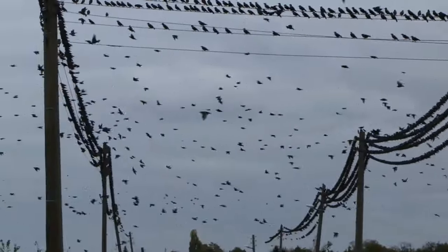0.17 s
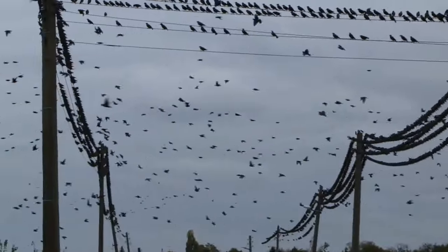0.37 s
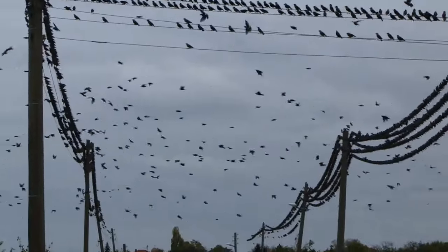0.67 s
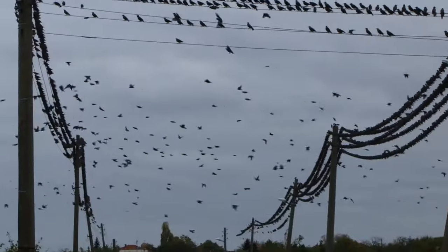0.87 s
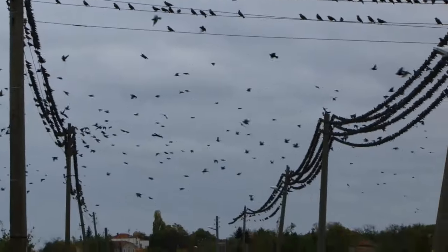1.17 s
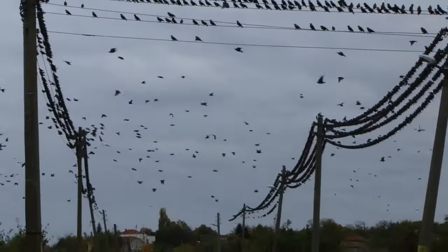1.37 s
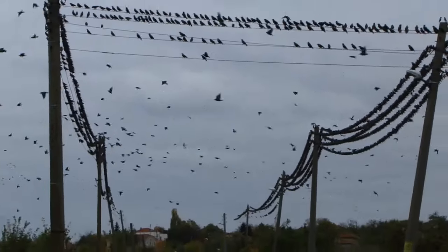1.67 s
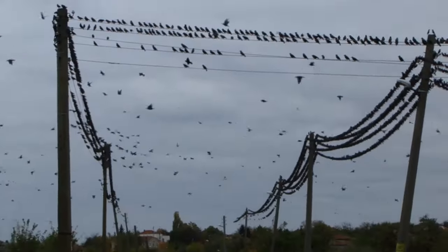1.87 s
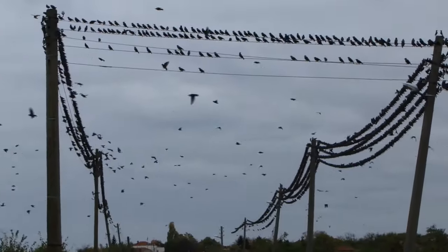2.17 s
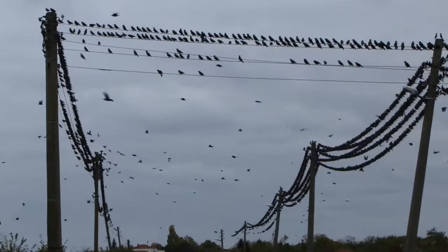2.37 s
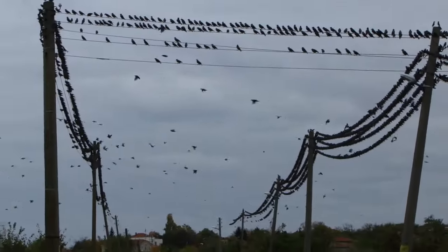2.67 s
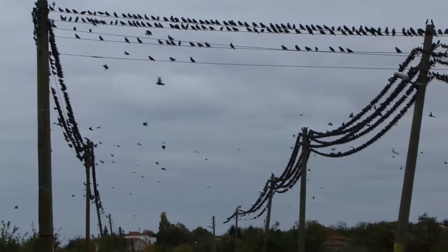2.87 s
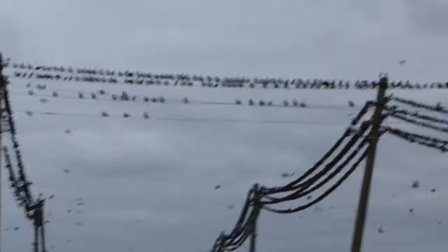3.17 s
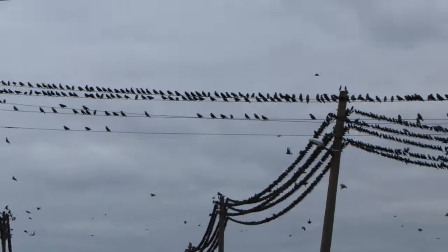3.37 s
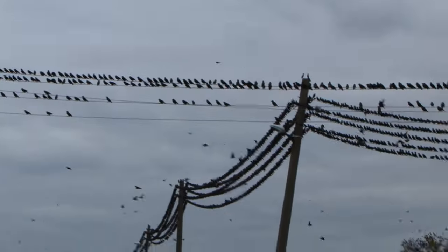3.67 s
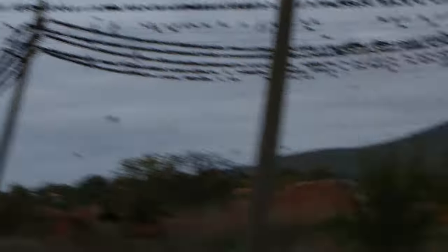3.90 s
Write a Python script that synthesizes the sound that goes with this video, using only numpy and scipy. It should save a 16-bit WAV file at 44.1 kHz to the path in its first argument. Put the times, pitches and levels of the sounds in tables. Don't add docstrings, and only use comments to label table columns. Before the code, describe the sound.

A large flock of small birds on wires and in flight makes a dense, continuous chatter for about four seconds, far voices fusing into a broad hiss. Tiny high whistles stand out nearby: a lower one at 1.3 s on the right, a brighter cluster around 1.95-2.25 s, and more near 2.6 and 3.0-3.1 s. Wind strikes the hand-held camera's two microphones as low, irregular, fluttering thumps, wide in stereo: heavy from the start to 0.6 s, strong again around 1.1-1.35 and 1.7-1.9 s, then thinning. Light plastic taps come at about 0.8-0.9 s and a soft one left at 1.5 s. Brief scratchy finger rubs at 3.15 and 3.3 s accompany the camera's turning, and the flock's colour loses some of its top. After a near calm around 3.45 s, a hard knock at 3.57 s, gusts returning, and the hardest clacking knocks at 3.8 s close the scene.

```python
import sys
import numpy as np
from scipy import signal
from scipy.fft import rfft, irfft
from scipy.io import wavfile
from scipy.ndimage import uniform_filter1d

SR = 44100
rng = np.random.default_rng(int(sys.argv[2]) if len(sys.argv) > 2 else 0)


def put_to_file(sound):
    columns = np.atleast_2d(sound).T
    safe = np.clip(columns, -1, 1)
    whole_steps = np.round(safe * 32767)
    wavfile.write(sys.argv[1], SR, whole_steps.astype(np.int16))


def boost(x):
    u = np.asarray(x, float) / 20
    return 10 ** u


N = 177987


def evened(x):
    return x / np.sqrt(np.mean(x ** 2) + 1e-20)


def read(points, hz, column=1):
    table = np.transpose(points)
    return np.interp(np.log(hz + 1), np.log(table[0] + 1), table[column])


def add(mix, s, sound):
    at = max(round(s * SR), 0)
    part = mix[:, at:at + sound.shape[1]]
    part += sound[:, :part.shape[1]]


def panned(x, pan_db):
    return x * boost(np.array([[pan_db / 2], [-pan_db / 2]]))


def slow(rate_hz, count):
    width = max(int(SR / rate_hz / 2), 1)
    noise = rng.standard_normal((count, N))
    return evened(uniform_filter1d(uniform_filter1d(noise, width), width))


# start in seconds, length in seconds, strength in dB.
GUSTS = [(0, 0.22, -29.5), (0.249, 0.028, -30.5), (0.336, 0.13, -34.5), (0.424, 0.056, -30.5),
         (0.653, .13, -39), (0.916, 0.065, -33), (1.034, 0.08, -41), (1.095, .14, -31), (1.282, .16, -34),
         (1.598, 0.11, -33.5), (1.692, 0.091, -31.5), (1.801, 0.11, -32.5), (1.945, 0.035, -35.5),
         (2.051, 0.11, -35), (2.222, 0.034, -35.5), (2.308, 0.077, -35.5), (2.504, 0.031, -39.5),
         (2.612, 0.024, -37), (2.703, 0.036, -45), (2.904, 0.038, -43), (3.158, 0.054, -41.5),
         (3.55, 0.065, -33.5), (3.635, 0.033, -36), (3.69, 0.13, -30.5), (3.828, 0.062, -34.5),
         (3.933, .03, -47.5), (3.982, 0.055, -35)]
# time in seconds, strength in dB.
BREEZE = [
    (0, -43),
    (1.5, -46.5),
    (2.4, -48),
    (3.1, -53),
    (3.45, -66),
    (3.6, -41),
    (4.04, -44),
]
GUST_EDGE_S, LEE_DB = 0.015, -4


def wind_strength():
    t = np.arange(N) / SR
    level_db = np.interp(t, *np.transpose(BREEZE))
    for s, length, db in GUSTS:
        inside = np.clip(np.minimum(t - s, s + length - t) / GUST_EDGE_S + 1, 0, 1)
        level_db = np.maximum(level_db, -60 + (db + 60) * inside)
    return level_db + np.array([[0], [LEE_DB]])


def thump(db, hz, coin, before=0.44, after=0.89, sag=0.063, kink=1.0):
    cycle = np.arange(-300, 500) / SR * hz
    shape = np.exp(-(cycle / np.where(cycle < 0, before, after)) ** 2)
    swing = np.cos(2 * np.pi * (cycle - sag * cycle ** 2)) * shape
    steepening = np.sin(2 * np.pi * 1.9 * cycle) * np.exp(-((cycle + 0.2) / 0.29) ** 2)
    swing += kink * boost(db) * steepening
    swing -= shape * swing.sum() / shape.sum()
    return boost(db) * (swing * np.sign(coin - .3))[None]


# time in seconds, peak in dB, frequency in Hz.
LEFT_THUMPS = [(.003, -9, 268), (.014, -9.5, 477), (.058, -15, 290), (.066, -8, 234), (.2, -19.5, 245),
               (.217, -23, 237), (.435, -7.5, 293), (.59, -10, 228), (.771, -15.5, 270), (.837, -14, 203),
               (1.112, -17, 268), (1.154, -16.5, 188), (1.165, -12.5, 335), (1.176, -16, 198),
               (1.321, -15, 312), (1.329, -5, 350), (1.694, -21, 296), (1.722, -10, 350), (1.82, -11, 228),
               (1.845, -16, 247), (1.886, -10, 287), (1.974, -18, 209), (2.116, -15.5, 219),
               (2.229, -15, 210), (3.585, -19, 182), (3.645, -11.5, 336), (3.735, -21, 300),
               (3.745, -21, 204), (3.779, -14, 250), (3.989, -17.5, 166)]
# time in seconds, peak in dB, frequency in Hz.
RIGHT_THUMPS = [(.009, -19, 190), (.073, -14, 210), (.089, -10.5, 272), (0.1, -12, 216), (.144, -14.5, 233),
                (0.179, -18, 196), (0.277, -20.5, 173), (.358, -20, 193), (0.443, -11, 285),
                (.471, -19, 209), (0.679, -20, 162), (1.165, -17, 227), (1.312, -13.5, 266),
                (1.625, -19, 227), (1.724, -6.5, 229), (1.831, -21, 180), (1.841, -17, 302),
                (2.141, -25, 290), (2.371, -21.5, 177), (3.575, -19, 600), (3.589, -20.5, 184),
                (3.708, -21, 238), (3.724, -19, 235), (3.736, -20, 246), (3.783, -17, 427),
                (3.817, -15, 287)]
EDDIES_PER_S, EDDY_DB, EDDY_SPREAD_DB, EDDY_HZ, EDDY_OCTAVES = 35, 12, 4.5, 145, 1.24


def eddies(level_db, leak_hz=75):
    out = np.zeros((2, N))
    lead_s = 300 / SR
    for port, table in enumerate((LEFT_THUMPS, RIGHT_THUMPS)):
        for (s, db, hz), coin in zip(table, rng.random(30)):
            add(out[port][None], s - lead_s, thump(db, hz, coin))
        small = rng.random((400, 4))[:int(EDDIES_PER_S * N / SR)]
        for k, (late, size, pitch, coin) in enumerate(small):
            s = (k + late) / EDDIES_PER_S
            gust_db = level_db[port, min(int(s * SR), N - 1)]
            db = gust_db + EDDY_DB + EDDY_SPREAD_DB * (size - .5)
            hz = EDDY_HZ * 2 ** (EDDY_OCTAVES * pitch)
            add(out[port][None], s - lead_s, thump(db, hz, coin))
    return signal.lfilter(*signal.butter(2, leak_hz, "high", fs=SR), out)


# frequency in Hz, level in dB.
BUFFET = [(20, -28), (45, -84), (65, -53.5), (110, 5), (150, 11.5), (250, 3), (330, 1), (450, 1),
          (650, -14), (900, -28)]


def wind(lumpy_db=3, calm_db=-14):
    hz = np.fft.rfftfreq(N, 1 / SR)
    rumble, calm = rng.standard_normal((2, 2, N))
    rumble = irfft(rfft(rumble) * boost(read(BUFFET, hz)), N)
    level_db = wind_strength()
    out = evened(rumble) * boost(1.243 * level_db + 5.0 + lumpy_db * slow(70, count=2))
    out += eddies(level_db)
    deep = evened(signal.lfilter(*signal.butter(2, [45, 140], "band", fs=SR), calm))
    out += deep * boost(calm_db + level_db + 2.3 * slow(25, count=2))
    return out


def tweet(length, hz0, hz1, rough, noise):
    tremble = uniform_filter1d(noise[:length], 60) * np.sqrt(60)
    hz = np.linspace(hz0, hz1, length) + rough * tremble
    return np.sin(2 * np.pi * np.cumsum(hz) / SR) * np.hanning(length) ** .7


def chatter(per_s, spread_db, lag):
    out, noise = np.zeros((2, N)), rng.standard_normal(40000)
    for when, pitch, glide, long, size, side, where in rng.random((3000, 7))[:int(per_s * N / SR)]:
        hz = 2600 + 10000 * pitch
        sweep_hz = 900 * (glide - .55)
        length = int(SR * (0.0086 + 0.0419 * long ** 3))
        note = tweet(length, hz, hz + sweep_hz, 175, noise[int(where * 30000):])
        delay = max(round(lag + 5.3 * (where - .5)), 0)
        gap = np.zeros(delay)
        pair = np.array([np.r_[gap, note], np.r_[note, gap]])
        loudness_db = spread_db * (size ** 3 + 1.1 * pitch)
        add(out, when * N / SR, boost(loudness_db) * panned(pair, 26 * (side - .5)))
    return evened(out)


# frequency in Hz, left level in dB, right level in dB.
FACING = [(350, -83.5, -72.5), (600, -66.5, -65.5), (926, -56.5, -57), (1360, -58.5, -58),
          (2000, -52.5, -52.5), (2800, -53.5, -49.5), (3320, -57.5, -60.5), (4500, -58.5, -55),
          (5450, -64, -54), (7000, -58, -50.5), (8500, -68.5, -66), (10500, -86, -85.5), (12800, -100, -81)]
# frequency in Hz, left level in dB, right level in dB.
TURNED = [(350, -63, -58), (600, -66.5, -65.5), (940, -58, -60), (1480, -60, -56.5), (2020, -52.5, -49),
          (2800, -54, -46), (3300, -54.5, -54), (4500, -53, -52), (5530, -54.5, -59), (7000, -70, -71),
          (8500, -71, -70), (10400, -79, -78.5), (12700, -87.7, -90)]
# time in seconds, turn from 0 to 1, flock level in dB.
TURN = [(0, 0.09, -3), (.15, 0.2, -5), (.6, 0.27, -2.2), (1.0, 0.08, -4), (1.3, 0.27, -2.2),
        (1.7, 0.18, -3.5), (2.1, 0.23, -3.5), (2.5, 0.33, -4), (2.9, 0.34, -5), (3.1, 0.36, -4.5),
        (3.3, 0.67, -5), (3.6, 0.68, -5), (4.04, 0.63, -4)]
TURNED_LAG = 8


def flock(same=0.29, lag=4.0, patchy_db=0.5, level_db=-30.0):
    shared, left, right = rng.standard_normal((3, N))
    common = np.array([np.roll(shared, round(lag)), shared])
    hiss = np.sqrt(1 - same) * np.array([left, right]) + np.sqrt(same) * common
    notes = .62 * chatter(740, 5, lag)
    hz, t, z = signal.stft(hiss + notes, SR, nperseg=512, noverlap=384)
    s, turn, level = np.transpose(TURN)
    turn = np.clip(np.interp(t, s, turn), 0, 1)
    patches = rng.standard_normal(z.shape[1:])
    patches = evened(uniform_filter1d(uniform_filter1d(patches, 8, 0), 20, 1))
    patches_db = patchy_db * (1.5 + (hz[:, None] / 9500) ** 4) * patches
    colour = np.array([np.outer(read(FACING, hz, column=c), 1 - turn)
                       + np.outer(read(TURNED, hz, column=c), turn) for c in (1, 2)])
    edge_db = -7.0 * np.maximum(np.log2(350 / (hz + 10)), 0)[:, None]
    edge_db -= 0.011 * np.maximum(hz - 12500, 0)[:, None]
    z = z * boost(colour + edge_db + np.interp(t, s, level) + patches_db)
    late = TURNED_LAG * np.clip(3 * turn - 1, 0, 1)
    z[0] *= np.exp(-2j * np.pi * np.outer(hz, late) / SR)
    return boost(level_db) * evened(signal.istft(z, SR, nperseg=512, noverlap=384)[1][:, :N])


# start in seconds, length in seconds, start pitch in Hz, end pitch in Hz, level in dB.
RIGHT_WHISTLES = [(.119, 0.081, 8400, 8240, -38), (.177, .047, 9450, 9220, -43),
                  (.193, .073, 8360, 8100, -32), (.518, 0.04, 8380, 8500, -43),
                  (.85, 0.066, 4660, 4670, -29), (1.27, 0.074, 3000, 2800, -25),
                  (1.657, 0.064, 8750, 8340, -40), (1.678, 0.066, 7350, 6920, -33),
                  (1.949, .07, 6660, 6770, -25.5), (2.019, 0.026, 5770, 5650, -22),
                  (2.097, 0.074, 6430, 7000, -28.5), (2.138, 0.059, 7010, 7560, -27),
                  (2.239, 0.029, 6360, 6300, -27), (2.589, 0.055, 7800, 7750, -31),
                  (2.929, 0.059, 7450, 7000, -34), (2.985, 0.063, 6940, 6300, -33),
                  (3.326, 0.064, 8530, 8450, -42)]
# start in seconds, length in seconds, start pitch in Hz, end pitch in Hz, level in dB.
FRONT_WHISTLES = [(.556, .049, 8380, 8410, -41), (.789, .035, 8100, 8400, -29),
                  (.829, .08, 9000, 8800, -34.5), (.908, .03, 8700, 8850, -40),
                  (.971, .044, 8100, 7900, -48), (1.434, .041, 8360, 8520, -31),
                  (1.485, .03, 4050, 4130, -41), (1.498, .033, 8200, 8000, -37),
                  (1.872, .11, 8500, 8200, -31.5), (2.155, .091, 8360, 8070, -30.5),
                  (2.615, .061, 6200, 6150, -27), (2.876, .039, 4500, 4800, -34),
                  (3.062, .067, 7800, 6940, -28), (3.075, .04, 7350, 8000, -36),
                  (3.09, .035, 5500, 5700, -25), (3.284, .048, 4320, 4620, -25),
                  (3.569, .06, 9050, 9200, -40), (3.927, .047, 5030, 4600, -44),
                  (3.981, .07, 8660, 8560, -32)]
RIGHT_PAN_DB, FRONT_PAN_DB = -10.5, 1


def whistles(boost_db=-7.5):
    out = np.zeros((2, N))
    for table, pan_db in ((RIGHT_WHISTLES, RIGHT_PAN_DB), (FRONT_WHISTLES, FRONT_PAN_DB)):
        for s, length, hz0, hz1, db in table:
            note = tweet(int(length * SR), hz0, hz1, 75, rng.standard_normal(8000))
            pair = np.array([np.roll(note, 4), note])
            add(out, s, boost(db + boost_db) * panned(pair, pan_db))
    return out


# time in seconds, peak in dB, click in dB, ring factor, left minus right in dB.
KNOCKS = [
    (.777, -19, -8, 0.33, 0),
    (.882, -26, -14, 0.76, -3),
    (.925, -21, -21, 0.38, -1),
    (1.468, -27, -20, 0.69, 15),
    (3.574, -13.5, -7, 0.28, 1),
    (3.756, -29, 2, 0.19, 2),
    (3.795, -11, -5, 0.85, 4.5),
    (3.808, -19, 1.5, 0.32, -8),
]
# frequency in Hz, level in dB, 60 dB decay time in seconds.
BODY = [(570, -3.5, .025), (807, 0.5, 0.017), (1217, 3, 0.027), (1900, -4, 0.013), (2455, 1, 0.011),
        (3490, -4.5, 0.011), (4600, -1.5, 0.011)]
PORT_SLIP, LOW_LOSS = 1.82, 0.39


def knocks(out):
    t = np.arange(3000) / SR
    band = signal.butter(1, [700, 5000], "band", fs=SR)
    for s, db, click_db, ring, pan_db in KNOCKS:
        phase = np.cumsum(rng.random((len(BODY), 2, 1)) * [[2 * np.pi], [PORT_SLIP]], axis=1)
        light_db = LOW_LOSS * (db + 8.5)
        modes = 0
        for (hz, mode_db, t60), p in zip(BODY, phase):
            decay_db = mode_db + light_db * (hz < 1000) - 60 * t / (t60 * ring)
            modes = modes + boost(decay_db) * np.sin(2 * np.pi * hz * t + p)
        click = signal.lfilter(*band, rng.standard_normal((2, 3000)))
        click *= boost(click_db + 4 - 60 * t / .016) * (1 - np.exp(-t / .0003))
        struck = modes * (1 - np.exp(-t / 0.00055)) + click
        add(out, s - .0005, boost(db - 1.0) * panned(struck, pan_db))


# start in seconds, length in seconds, level in dB.
RUBS = [
    (3.155, 0.034, -39),
    (3.323, .035, -36),
]


def rubs(out):
    band = signal.butter(1, [350, 2500], "band", fs=SR)
    for s, length, db in RUBS:
        size = int(length * SR)
        grit = rng.standard_normal((2, size)) * rng.exponential(1, size) * np.hanning(size)
        add(out, s, boost(db) * evened(signal.lfilter(*band, grit)))


def hands():
    out = np.zeros((2, N))
    knocks(out)
    rubs(out)
    return signal.lfilter(*signal.butter(10, 11600, fs=SR), out)


def scene():
    gusts = wind()
    widened = gusts - 0.46 * gusts[::-1]
    return widened + flock() + whistles() + hands()


def top_cut(x):
    return signal.sosfilt(signal.butter(12, 13740, fs=SR, output="sos"), x)


def record(dry):
    band = signal.butter(2, [10500, 13000], "band", fs=SR)
    hiss = boost(-69.0) * signal.lfilter(*band, rng.standard_normal(N))
    mix = signal.lfilter(*signal.butter(2, 30, "high", fs=SR), dry + hiss)
    return top_cut(mix)


dry = scene()
out = record(dry)
put_to_file(out)
```